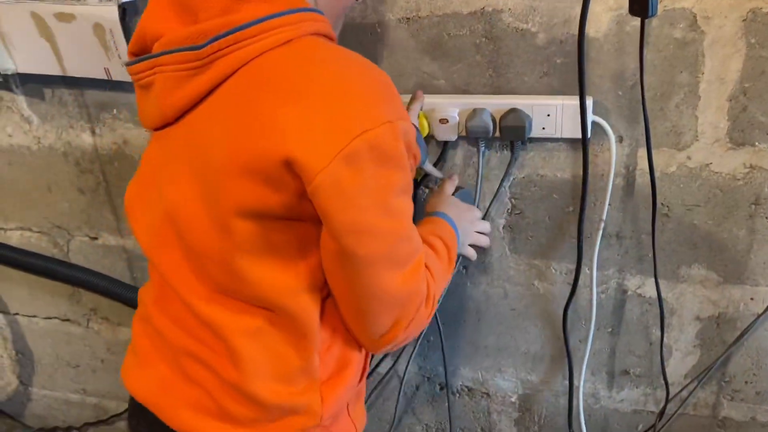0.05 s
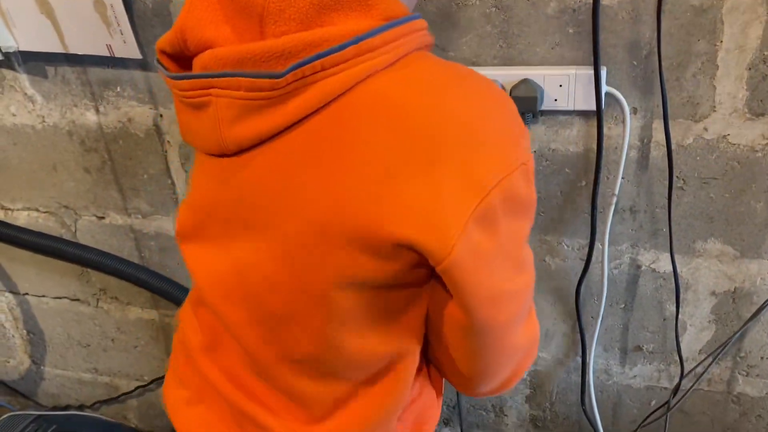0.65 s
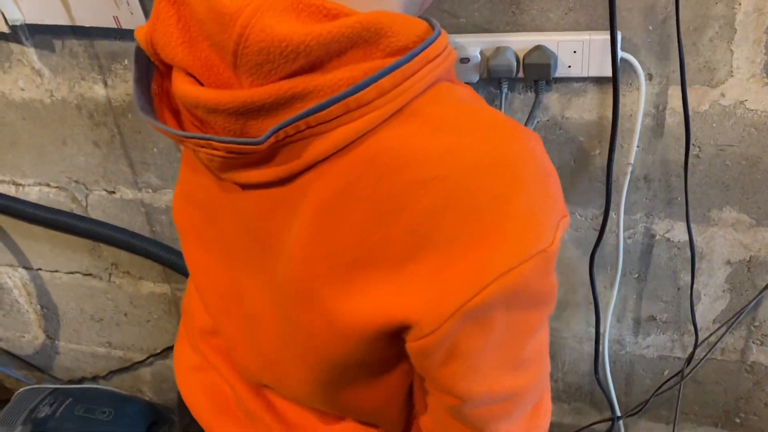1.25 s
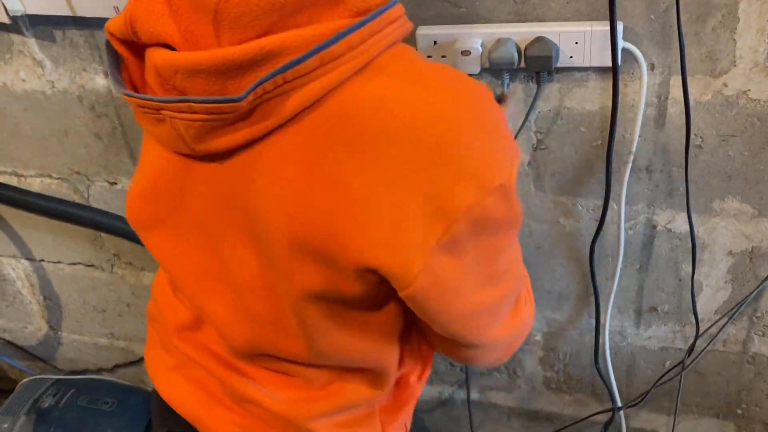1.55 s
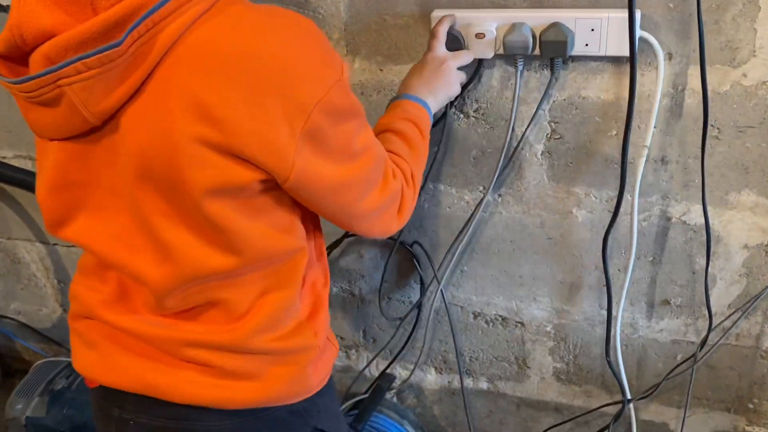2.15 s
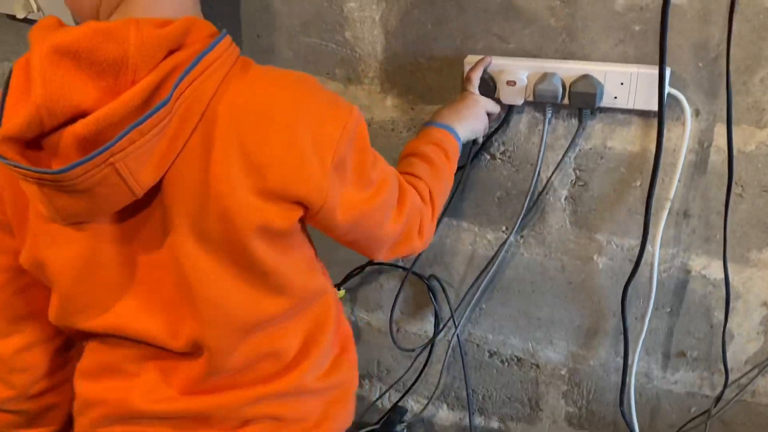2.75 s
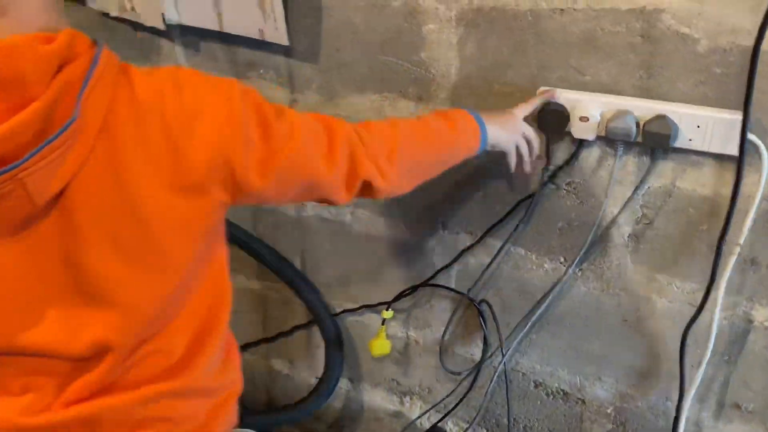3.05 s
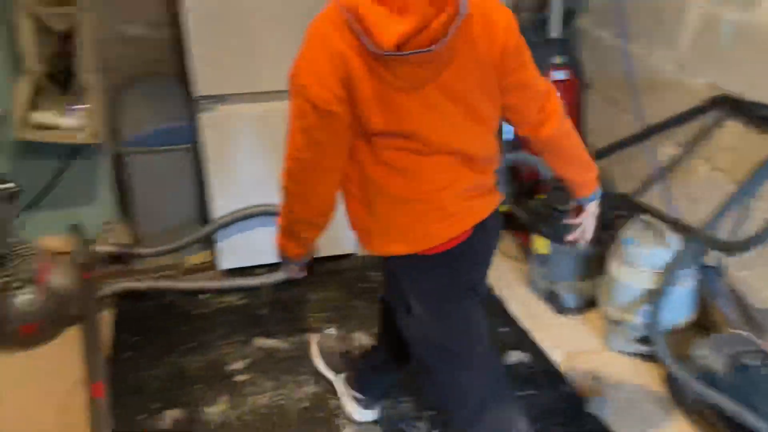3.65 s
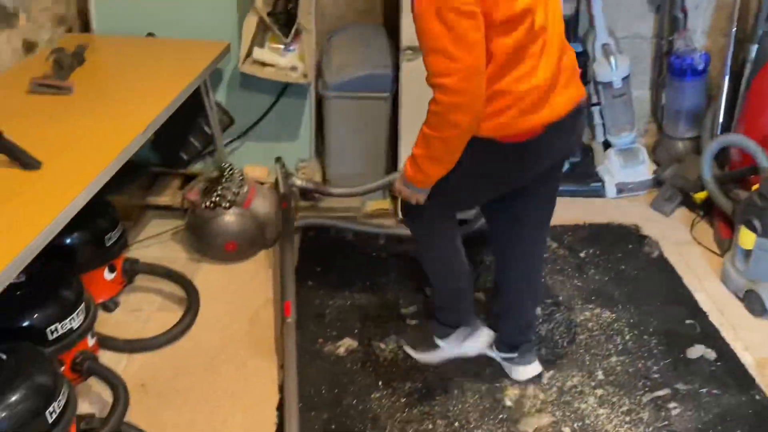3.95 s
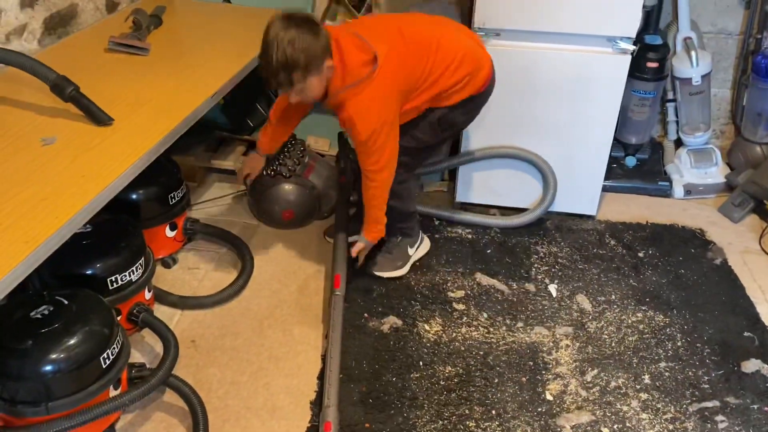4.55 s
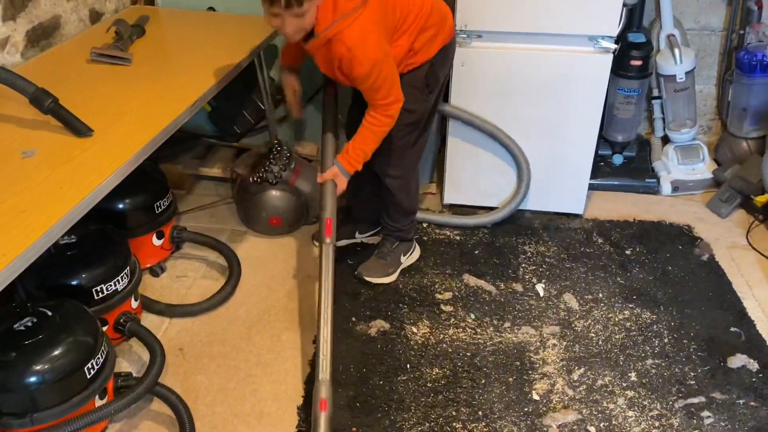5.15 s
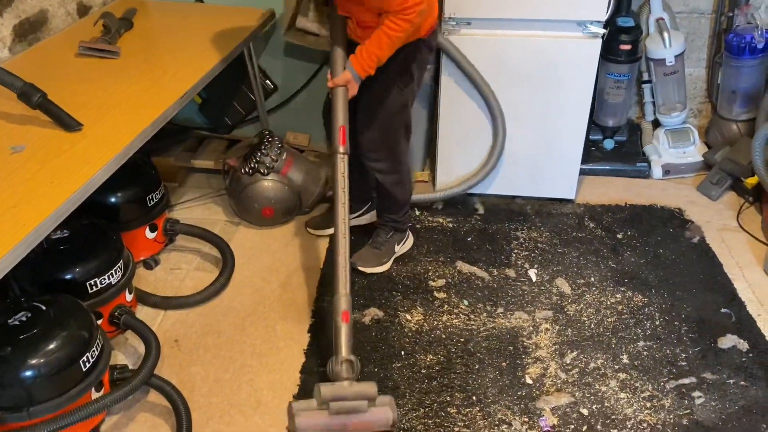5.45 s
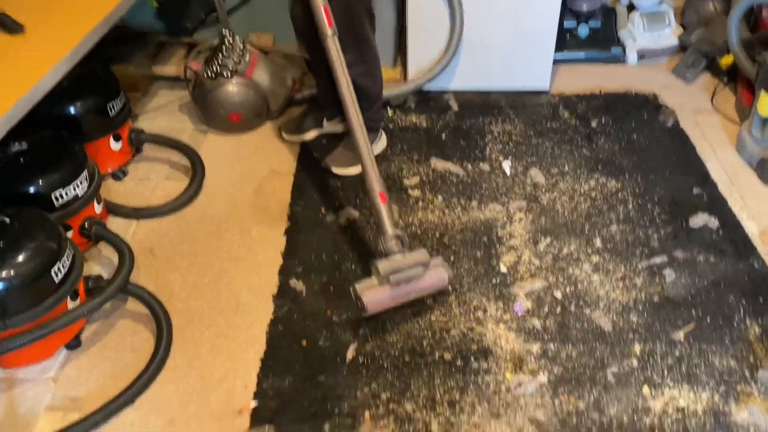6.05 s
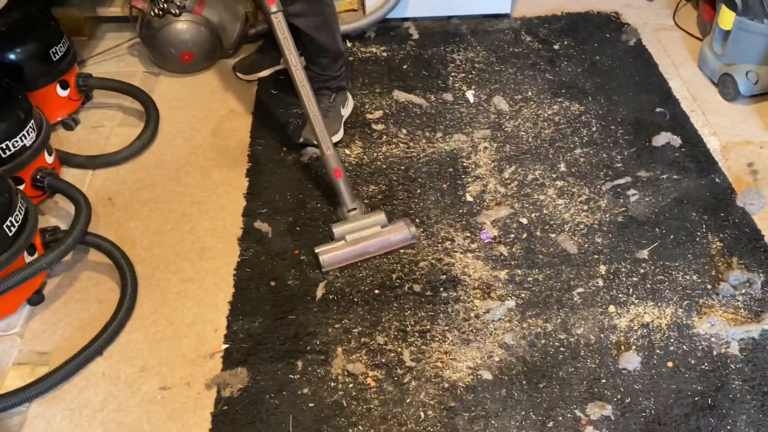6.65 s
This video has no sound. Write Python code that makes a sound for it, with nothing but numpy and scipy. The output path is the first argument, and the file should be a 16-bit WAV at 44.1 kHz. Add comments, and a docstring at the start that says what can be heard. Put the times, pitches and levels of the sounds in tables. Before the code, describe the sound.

The sound opens with light plastic ticks and faint sleeve and cable rustle, close by in a small garage with a short echo. A plug snaps loudly in an extension lead at about 1.3 seconds and again at 1.9, with smaller clicks and scrapes continuing until about 2.8. A soft, dry thump comes at 3.2 seconds, followed by a few quiet footsteps.

At 4.7 seconds a canister vacuum cleaner switches on, slightly to the left. It growls and hums, rising quickly in pitch, with a sharp click at 4.9. By 5.5 seconds it is a steady rush of air with thin, high, wavering whistles. From about 5.9 seconds grit ticks and crackles up the tube. At 6.4 the nozzle scrapes and knocks loudly on the rug, adding a low drone, and the vacuum keeps running to the end, near 7 seconds.

```python
"""Plug clicks and a few steps in a block-walled garage, then a canister vacuum starts and roars.
The plug scrapes and snaps into an extension lead, ringing its plastic case; sleeves and cable rustle.
The motor hums at twice the mains rate and runs up, its shaft tone sweeping through body resonances.
Turbulent air rushes through the hose and edge tones whistle; the nozzle is pushed over a rug,
knocking and sucking up grit."""
import sys
import numpy as np
from scipy import signal
from scipy.fft import rfft, irfft
from scipy.io import wavfile
from scipy.ndimage import uniform_filter1d

SR = 44100
rng = np.random.default_rng(int(sys.argv[2]) if len(sys.argv) > 2 else 0)


def wav_out(sig):
    """Save sig, one row per channel (or a flat mono array), as 16-bit PCM at SR to the path in sys.argv[1]."""
    wavfile.write(sys.argv[1], SR, np.round(np.clip(np.atleast_2d(sig).T, -1, 1) * 32767).astype(np.int16))


N = 304731
T = np.arange(N) / SR
FREQS = np.arange(N // 2 + 1) * SR / N + 0.0009  # offset keeps the log finite
SWITCH_ON_S, HUM_HZ, SHAFT_TOP_HZ = 4.695, 100.0, 650.8


def motor(blades=11, whine_re_hiss_db=-16, growl_db=-32.5, inrush_s=0.17, judder=0.14, rough_db=5.0):
    """Mains hum, start-up growl, out-of-balance shaft tone and thin fan-blade whine."""
    # mains hum: (multiple of HUM_HZ, level [dB])
    harmonics = [(1, -37.5), (2, -55.5), (3, -51.5), (4, -52)]
    # start-up growl spectrum: (frequency [Hz], level [dB])
    growl_colour = [(100, -34), (170, -12), (230, 1), (400, -1), (520, -25), (760, -7), (1100, -29),
                    (1900, -20), (4000, -55)]
    # body and room modes the shaft sweeps through: (centre [Hz], half width [Hz], level [dB])
    modes = [(288, 27, -35), (338, 22.5, -25), (405, 20, -31.5), (447, 24, -38.5), (555, 19, -38),
             (573, 11.3, -29.5), (600.7, 9.2, -31), (618.2, 5.1, -29), (640.8, 5.7, -32), (647, 3.8, -37.5)]
    hum = sum(undb(db) * tone(np.full(N, k * HUM_HZ)) for k, db in harmonics)
    # starting current shakes the rotor at the hum rate
    inrush = np.exp(-np.maximum(T - SWITCH_ON_S, 0) / inrush_s)
    torque = 1 + judder * np.sqrt(inrush) * np.sin(2 * np.pi * HUM_HZ * T)
    growl = undb(growl_db) * noise(growl_colour) * inrush * torque
    speed_hz = shaft_hz()
    wobbling_hz = speed_hz * (1 + 0.00145 * walk(30))
    response = sum(undb(db) * bell(speed_hz, centre_hz, width_hz) for centre_hz, width_hz, db in modes)
    roughness = undb(0.12 * walk(25) + rough_db * inrush ** 0.29 * walk(150))
    shaft = tone(wobbling_hz) * response * torque * roughness
    _, hiss_gain = flow()
    whine = tone(blades * wobbling_hz) * hiss_gain * undb(whine_re_hiss_db + 2 * walk(28))
    return pan_left(hum + whine + growl, 0.7) + pan_left(shaft, 2.0)


def shaft_hz(spin_up_hz=470, spin_up_s=0.234, creep_hz=77, creep_s=0.7):
    """The shaft closes in on top speed: fast at first, then creeping."""
    t = np.maximum(T - SWITCH_ON_S, 0)
    return SHAFT_TOP_HZ - spin_up_hz * np.exp(-t / spin_up_s) - creep_hz * np.exp(-t / creep_s)


def air(throb=0.085):
    """Turbulent fan rush, rippled by motor torque, and nozzle hiss."""
    # spectra of fan rush and nozzle hiss: (frequency [Hz], level [dB])
    rush_colour = [(30, -23), (70, -2.5), (160, -6), (220, 5.5), (290, -0.5), (400, 1.5), (600, 2.5),
                   (1100, -0.9), (2300, -2), (3200, -2), (4500, -5.5), (5700, -11), (8000, -11),
                   (15500, -19)]
    hiss_colour = [(1000, -28), (4000, -3), (5800, -11.5), (6600, 0), (7100, -0.5), (7900, -2),
                   (8600, -0.5), (9600, -7), (10700, -1), (11600, -9.5), (13500, -15.5), (15500, -56)]
    rush_gain, hiss_gain = flow()
    rush = duct(rush_colour) * rush_gain * undb(0.5 * walk(14))
    hiss = duct(hiss_colour) * hiss_gain * undb(1.4 * walk(22))
    return rush * (1 + throb * np.sin(2 * np.pi * HUM_HZ * T)) + hiss


def flow(rush_db=-27.5, hiss_db=-35, rush_exponent=1.94, hiss_exponent=4.5):
    """Rush and hiss gains: powers of shaft speed, shifted by the nozzle's seat on the rug."""
    # nozzle set down and pushed: (time [s], rush change [dB], hiss change [dB])
    nozzle = [(5.45, 0, 0.5), (5.8, 0, 7), (6.19, 1.5, 7), (6.43, 3, 5), (6.5, -1, 2), (6.9, .5, 5)]
    times_s, rush_change_db, hiss_change_db = np.array(nozzle).T
    speed = shaft_hz() / SHAFT_TOP_HZ
    rush_gain = undb(rush_db + np.interp(T, times_s, rush_change_db)) * speed ** rush_exponent
    hiss_gain = undb(hiss_db + np.interp(T, times_s, hiss_change_db)) * speed ** hiss_exponent
    return rush_gain, hiss_gain


def duct(colour, ripple_db=4.0, bend_s=0.4):
    """Hose noise: as the hose bends, one set of narrow resonances gives way to another."""
    angle = np.pi / 2 * T / bend_s
    return np.cos(angle) * noise(colour, ripple_db) + np.sin(angle) * noise(colour, ripple_db)


def whistles(flutter_db=4.5, waver=0.002):
    """Edge tones catch, glide and break off; turbulence makes them airy."""
    # (start [s], end [s], first [Hz], middle [Hz], last [Hz], level [dB], pitch scatter [fraction])
    edge_tones = [(4.888, 5.054, 5100, 5520, 6100, -43.5, 0.012),
                  (5.392, 5.56, 2550, 3100, 3330, -36.5, 0.03),
                  (5.566, 5.725, 2650, 2610, 2550, -40, 0.036),
                  (5.655, 5.865, 4330, 4920, 5320, -42.5, 0.017),
                  (5.62, 6.95, 6980, 7000, 7150, -38.5, 0.025), (6.08, 6.31, 7020, 7040, 7060, -35, 0.0092),
                  (5.495, 5.69, 10500, 10800, 10750, -44, 0.005),
                  (5.69, 5.825, 10170, 10080, 10300, -32, 0.001),
                  (5.815, 5.89, 10560, 10640, 10620, -43, 0.004),
                  (5.884, 6.022, 10200, 10200, 10360, -35.5, 0.001),
                  (6.018, 6.15, 10500, 10780, 10700, -33.5, 0.002),
                  (6.501, 6.805, 758, 752, 742, -42.5, 0.014)]
    out = np.zeros(N)
    jitter = walk(600)
    flutter = undb(flutter_db * walk(110))
    wander = 1 + waver * walk(45)
    for start_s, end_s, first_hz, middle_hz, last_hz, db, scatter in edge_tones:
        on = (T > start_s) & (T < end_s)
        progress = np.linspace(0, 1, on.sum())
        glide_hz = np.polyval(np.polyfit([0, 0.5, 1], [first_hz, middle_hz, last_hz], 2), progress)
        envelope = flutter[on] * np.abs(np.sin(np.pi * progress)) ** 0.33
        out[on] += undb(db) * envelope * tone(glide_hz * (wander[on] + scatter * jitter[on]))
    return out


def grit(start_s=5.85, full_s=6.3, full_per_s=130, spread_db=4, db=-42):
    """Crumbs tick against the tube once the nozzle reaches them."""
    per_s = full_per_s * np.clip((T - start_s) / (full_s - start_s), 0, 1)
    hits = rng.random(N) < per_s / SR
    sizes = undb(spread_db * np.minimum(rng.exponential(size=N), 3))
    ticks = signal.sosfilt(signal.butter(2, [1200, 8000], "band", fs=SR, output="sos"), hits * sizes)
    return garage(undb(db) * ticks / np.std(ticks[T > start_s]), wet_db=-11)


def drone(start_s=6.42, swell_s=0.039, hz=205, db=-41, bite_db=9, bite_s=0.038):
    """The nozzle bites into the rug: the wand booms, then drones low."""
    body = noise([(hz / 4, -50), (hz / 1.25, -16), (hz, 0), (hz * 1.25, -14), (hz * 4, -55)])
    t = np.maximum(T - start_s, 0)
    boom_db = bite_db * np.exp(-(t / bite_s) ** 2 / 2)
    return undb(db + boom_db) * body * np.clip(t / swell_s, 0, 1)


def clicks(scatter_db=1.8, detune=0.0026, lead_s=0.003, size=16384):
    """Plug, socket, switch and wand: each contact is a gritty burst that rings the plastic case."""
    # (time [s], level [dB], treble cut [dB/octave], contact time [ms], ring re burst [dB],
    #  main resonance [Hz], its height [dB], its half width [octaves])
    contacts = [(0.024, -47, -4, 1.5, -20, 7600, 17, 0.15), (0.039, -41, -9, 1.2, -20, 7800, 21, 0.17),
                (0.057, -40.5, 0.5, 1.76, -8, 785, 7, 0.43), (0.065, -49, -3, 3, -14, 7500, 16, 0.11),
                (0.197, -53, -0.5, 3.2, -3.5, 5540, 5, 0.51), (0.432, -51.5, 3, 4, -16, 2170, 21, 0.38),
                (0.710, -45, 4, 8.6, -22, 2640, 8.5, 0.38), (0.821, -46, -2.5, 6.1, -22, 1930, 7, .34),
                (0.838, -43.5, 3, 2.3, -18, 570, 8, 0.25), (1.181, -52, -1, 14, -5, 7050, 6, 0.37),
                (1.2768, -16.5, 1, 5.9, -2, 1063, 10, 0.25), (1.282, -15, -4, 3.8, -32, 2420, 5, .25),
                (1.516, -32, 3, 4.9, -10, 1910, 14, 0.17), (1.517, -42.5, 0, 3.7, -12, 3940, 14, 0.18),
                (1.582, -33.5, 3, 2.7, -24, 3070, 8, 0.44), (1.598, -47, 11, 6.2, -13, 737, 19, 0.17),
                (1.649, -44, 0, 10.7, -6, 3370, 10.5, 0.97), (1.843, -25.5, 4, 2.54, -6, 660, 4.5, 0.14),
                (1.891, -15, -.5, 2.18, -8.5, 1860, 6, 0.34), (1.893, -25, 5.5, 4, -4.5, 640, 8.5, 0.15),
                (2.166, -48.5, 18, 2.7, -18, 528, 7, .34), (2.209, -35.5, 8, 2.7, -14, 1180, 8, .34),
                (2.361, -44, -2.5, 3.4, -2, 655, 18, .2), (2.449, -30.5, -0.5, 3.6, -15, 665, 13, 0.38),
                (2.449, -38.5, 1, 3.5, -4, 1350, 20, .13), (2.537, -31.5, 2.5, 1.9, -26, 1600, 8, 0.71),
                (2.687, -52, 6.5, 5, -6, 667, 13, .3), (3.230, -37, 4, 1.26, -21.5, 2800, 11.5, 0.75),
                (3.23, -40.5, 2.5, 1.9, -14, 1360, 13.5, 0.47), (4.077, -44, 8.5, 2.6, -22, 890, 5, 0.29),
                (4.669, -40, 0.5, 25, -27, 1770, 6, 1), (4.768, -40, -5, 1.5, -20, 11000, 10, .34),
                (4.913, -23, 4.5, 3.3, -14, 1890, 12.5, 0.25), (4.932, -32, 5.5, 3, -14, 2400, 13, 0.15)]
    # case modes, close pairs beat: (frequency [Hz], level [dB], T60 [s])
    case_modes = [(635, -4, .19), (664, -3.5, .2), (960, -2, .12), (1113, 0, .16), (1165, -3, .14),
                  (1366, -1, .2), (1550, -4, .14), (1905, -2, .13), (2099, -2, .12), (2353, -4, .17),
                  (2560, -5, .18), (3050, -7, .16), (3450, -6, .15), (3950, -6, .13)]
    out = np.zeros(N)
    t = np.maximum(T[:size] - lead_s, 0)
    mode_hz, mode_db, t60_s = np.array(case_modes).T[:, :, None]
    decay = np.exp(-np.log(1000) * t / t60_s)
    ring_highpass = signal.butter(4, 520, "high", fs=SR, output="sos")  # the case ring carries no bass
    for s, db, tilt_db, contact_ms, ring_db, centre_hz, peak_db, octaves in contacts:
        burst = plastic(contact(t, contact_ms), tilt_db, centre_hz, peak_db, octaves)
        # each blow lands elsewhere and weights the modes anew
        weight, shift, phase = rng.standard_normal((3, len(case_modes), 1))
        gain = undb(mode_db + 1.1 * peak_db * octave_bell(mode_hz, centre_hz, octaves)
                    + scatter_db * weight)
        partials = np.sin(2 * np.pi * (mode_hz * (1 + detune * shift) * t + phase))
        ring = signal.sosfilt(ring_highpass, np.sum(gain * decay * partials, axis=0) * (t > 0))
        add(out, s - lead_s, undb(db) * (burst + undb(ring_db) * unit(ring) * np.std(burst)))
    return garage(out, wet_db=-2.0)


def contact(t, contact_ms, passes=6):
    """A short gritty force with a near-flat spectrum."""
    envelope = (t > 0) * np.exp(-t * 1000 / contact_ms)
    force = rng.choice([-1, 1], len(t)) * envelope
    for _ in range(passes):
        whitened = irfft(np.exp(1j * np.angle(rfft(force))))
        force = whitened * (envelope > 0.03)
    return unit(force) * np.sqrt(np.mean(envelope ** 2))


def plastic(force, tilt_db, centre_hz, peak_db=7.5, octaves=0.34):
    """A force heard through plastic parts; minimum phase, so they ring only after it."""
    # response of the plastic: (frequency [Hz], level [dB])
    colour = [(100, -31), (250, -24), (480, -24), (640, -8), (1100, -8.5), (2400, -8), (3500, -12),
              (5000, -13), (8000, -17.5), (11000, -21.5), (15500, -34)]
    n = len(force)
    hz = np.arange(n // 2 + 1) * SR / n + 1
    cut_db = tilt_db * np.log2(np.clip(hz, 500, None) / 1500)
    db = across(colour, hz) - cut_db + peak_db * octave_bell(hz, centre_hz, octaves)
    cepstrum = irfft(np.log(unit(undb(db))), n)
    causal = np.r_[1, np.full(n // 2 - 1, 2), 1, np.zeros(n // 2 - 1)]
    return irfft(rfft(force) * np.exp(rfft(cepstrum * causal)), n)


def thuds(attack_s=0.0027, size=16384):
    """Soft blows of feet, starting jolt and nozzle: band-limited bursts with a rounded attack."""
    # (time [s], level [dB], decay [ms], band top [Hz])
    blows = [(0.725, -50, 18, 304), (0.895, -46, 7.3, 397), (1.312, -45, 82, 380), (1.412, -46, 19, 330),
             (1.924, -43.5, 19, 280), (2.168, -43.5, 43, 340), (2.700, -52.5, 18, 450),
             (3.324, -53.5, 15.5, 360), (3.735, -42.5, 12.6, 420), (4.419, -52, 33, 414),
             (4.711, -31, 18, 170), (5.948, -36, 27, 223), (6.388, -15.5, 7.8, 770),
             (6.427, -13, 13.2, 1220), (6.405, -29.5, 74, 100)]
    out, t = np.zeros(N), T[:size]
    for s, db, decay_ms, top_hz in blows:
        force = rng.standard_normal(size)
        band = signal.butter(2, [max(top_hz / 4, 58), top_hz], "band", fs=SR, output="sos")
        envelope = (1 - np.exp(-t / attack_s)) * np.exp(-t * 1000 / decay_ms)
        thud = signal.sosfilt(band, force * envelope) / np.std(signal.sosfilt(band, force))
        add(out, s, undb(db) * thud)
    return garage(out, wet_db=-5.5)


def scrapes(grain_db=4.5, size=16384):
    """Pins, sleeve and soles slide: swells of tiny uneven slips."""
    # (peak time [s], level [dB], treble cut [dB/octave], half length [ms], main resonance [Hz])
    slides = [(0.020, -54.5, 5.5, 17, 1140), (0.335, -75, 5, 120, 2200), (1.168, -53, 3, 7, 1670),
              (1.275, -41, 2.5, 5.7, 1003), (1.605, -53.5, 4, 19, 900), (2.363, -39.5, 6, 5.5, 650),
              (2.779, -42, 1.5, 10, 1316), (3.051, -59, 0, 22.5, 2600), (3.742, -58, 3.5, 19, 1250),
              (4.140, -62.5, 1.5, 82, 2180), (4.412, -55, 2.5, 24, 1810), (4.716, -40, 3.5, 32.4, 1500),
              (6.365, -31, 4.5, 35, 2020)]
    out, t = np.zeros(N), T[:size] - T[size // 2]
    for s, db, tilt_db, half_ms, centre_hz in slides:
        slips = unit(rng.standard_normal(size) * undb(grain_db * rng.standard_normal(size)))
        scrape = undb(db) * plastic(slips * bell(t, 0, half_ms / 1000), tilt_db, centre_hz)
        add(out, s + t[0], scrape[s + t >= 0])
    return garage(out, wet_db=-5.0)


def thump(s=3.190, db=-32, drop_hz=560, end_hz=42, fall_s=0.0028, hold_s=0.029, size=4096):
    """A close, dry thump whose pitch drops within a few cycles."""
    out, t = np.zeros(N), T[:size]
    hz = end_hz + drop_hz / (1 + (t / fall_s) ** 1.63)
    envelope = (1 - np.exp(-t / 0.0015)) * np.exp(-(t / hold_s) ** 3)
    add(out, s, -undb(db) * tone(hz) * envelope)
    return out


def clothing(rustle_boost_db=2.5, grain_db=2):
    """Each move swells a grainy rustle of sleeves and cable over a low handling rumble."""
    # arm, cable and leg moves: (peak time [s], half length [s], rustle [dB], rumble [dB])
    moves = [(0.04, 0.093, -64.5, -66), (0.277, 0.27, -87, -63.5), (0.85, 0.11, -74.5, -60),
             (1.37, 0.18, -70, -54.5), (1.66, 0.12, -70, -55), (2.168, 0.1, -80, -58.5),
             (2.324, 0.12, -66.5, -64.5), (2.5, 0.1, -71, -55), (2.783, 0.076, -69.5, -57.5),
             (3.035, 0.077, -68, -63), (3.224, 0.1, -71, -61), (3.522, 0.18, -81, -100),
             (3.737, 0.089, -68, -69), (3.99, 0.16, -76.5, -89), (4.163, 0.14, -69, -81),
             (4.527, 0.19, -65, -72)]
    # spectra of rustle and rumble: (frequency [Hz], level [dB])
    rustle_colour = [(200, -6.5), (600, -1.5), (1500, 0.5), (2500, 1.5), (5000, -9.5), (8000, -8),
                     (11000, -9.5), (15500, -29)]
    rumble_colour = [(20, -20.5), (40, -6), (75, -2.5), (140, -8), (280, -8.5), (500, -18), (1500, -28.5),
                     (8000, -53)]
    rustle_gain, rumble_gain = undb(-87), undb(-75.5)  # floor between moves
    for s, half_s, rustle_db, rumble_db in moves:
        swell = bell(T, s, half_s)
        rustle_gain = rustle_gain + undb(rustle_db) * swell
        rumble_gain = rumble_gain + undb(rumble_db) * swell
    rustle = noise(rustle_colour) * undb(rustle_boost_db + 1.6 * walk(40) + grain_db * walk(300))
    rumble = noise(rumble_colour) * undb(2 * walk(21))
    return rustle_gain * rustle + rumble_gain * rumble


def garage(x, wet_db, delay_s=0.002, build_s=0.0063, size=32768):
    """Direct sound plus a dense tail off the block walls; lows ring longest."""
    # room decay: (frequency [Hz], T60 [s])
    room_t60 = [(100, 0.39), (400, 0.26), (1000, 0.21), (2800, 0.21), (7000, 0.2), (15000, 0.19)]
    t, tail = T[:size], 0
    spectrum = rfft(noise([(20, 0.0091), (20000, 0.0037)])[:, :size])  # near white
    octave = np.log2(np.clip(np.arange(size // 2 + 1) * SR / size, 125, 16000) / 125)
    for k in range(8):
        band = irfft(spectrum * np.maximum(1 - abs(octave - k), 0), size)
        tail = tail + band * undb(-60 * t / across(room_t60, 125 * 2 ** k))
    tail = tail * np.clip((t - delay_s) / build_s, 0, 1)
    tail = tail / np.sqrt(np.sum(tail ** 2) / 2)
    return x + undb(wet_db) * signal.fftconvolve(np.atleast_2d(x), tail, axes=1)[:, :N]


def noise(colour, ripple_db=0, ripple_hz=42):
    """Coloured stereo noise of rms 1; ripple adds narrow duct resonances."""
    # stereo width: (frequency [Hz], side minus mid [dB])
    width = [(25, -8.5), (60, -13), (150, -13.5), (300, -10.5), (600, -1), (1500, -2), (3500, -3),
             (5500, 2.5), (7000, -20), (15000, -28)]
    knots_hz = np.arange(0, SR / 2, ripple_hz)
    heights = np.minimum(rng.standard_normal(2048), 1.6)[:len(knots_hz)]
    ripple = np.interp(FREQS, knots_hz, heights) * np.minimum(FREQS / 1500, 1)
    mid, side = rfft(rng.standard_normal((2, N))) * undb(across(colour, FREQS) + ripple_db * ripple)
    side = side * undb(across(width, FREQS))
    return unit(irfft(np.array([mid + side, mid - side]), N))


def walk(rate_hz):
    """Random steps smoothed twice; spread near 1."""
    hold = int(SR / rate_hz)
    steps = np.repeat(rng.standard_normal(N // hold + 1), hold)
    return 1.1 * uniform_filter1d(uniform_filter1d(steps, hold), hold)[:N]


def tone(hz):
    """Sine of rms 1 along a pitch curve."""
    return np.sqrt(2) * np.sin(2 * np.pi * np.cumsum(hz) / SR)


def bell(x, centre, half_width):
    """Gaussian of height 1."""
    return np.exp(-((x - centre) / half_width) ** 2)


def octave_bell(hz, centre_hz, octaves):
    """Gaussian of height 1 in log frequency."""
    return bell(np.log2(hz / centre_hz), 0, octaves)


def across(table, hz):
    """Table lookup in log frequency."""
    rows = np.array(table)
    return np.interp(np.log(hz), np.log(rows[:, 0]), rows[:, 1])


def undb(db):
    """Decibels to gain."""
    return 10 ** (np.asarray(db) / 20)


def unit(x):
    """Scale to rms 1."""
    return x / np.sqrt(np.mean(x ** 2))


def add(out, s, x):
    """Mix x in at time s."""
    i = max(int(s * SR), 0)
    out[..., i:i + x.shape[-1]] += x[..., :N - i]


def pan_left(x, db):
    """Left up, right down, each by db."""
    return x * undb([[db], [-db]])


def skew(x, left_lead):
    """Retard the right channel's phase per frequency."""
    rotation = np.exp(-2j * np.pi * across(left_lead, FREQS))
    return np.array([x[0], irfft(rfft(x[1]) * rotation, N)])


def scene():
    """Plug and footsteps, then the vacuum a little to the left."""
    # vacuum's phase between the ears: (frequency [Hz], left lead [turns])
    vacuum_lead = [(400, 0.024), (660, 0.25), (1100, 0.06), (1900, 0), (3100, 0.16), (4100, 0.036),
                   (5200, 0.15), (6300, 0)]
    running = np.clip((T - SWITCH_ON_S) / 0.0092, 0, 1)
    airflow = pan_left(air() + whistles() + grit() + drone(), 0.4)
    vacuum = skew(running * (motor() + airflow), vacuum_lead)
    handling = clicks() + scrapes() + thuds() + thump() + clothing()
    return vacuum + pan_left(handling, 0.4)


def record(dry, top_hz=15800):
    """Two microphone ports differ in treble phase; a steep low-pass cuts the top."""
    # phase between the ports: (frequency [Hz], left lead [turns])
    port_lead = [(7500, 0), (8700, -.5), (9400, -.5), (10700, -1), (11700, -1), (12700, -1.5),
                 (13700, -1.5), (14200, -2)]
    lowpass = signal.ellip(10, 0.2, 70, top_hz, fs=SR, output="sos")
    return signal.sosfilt(lowpass, skew(dry, port_lead))


dry = scene()
out = record(dry)
wav_out(out)
```